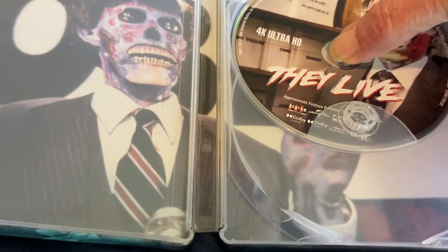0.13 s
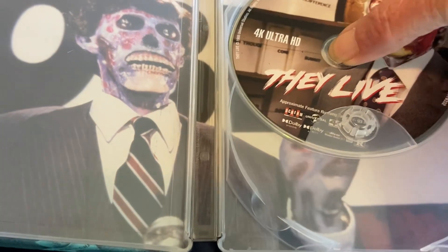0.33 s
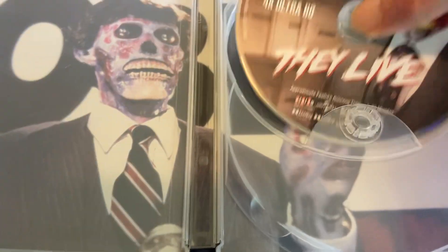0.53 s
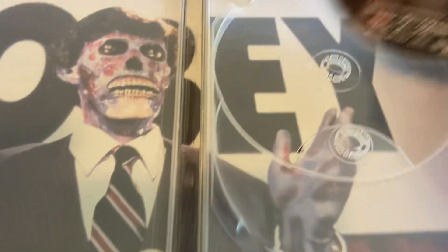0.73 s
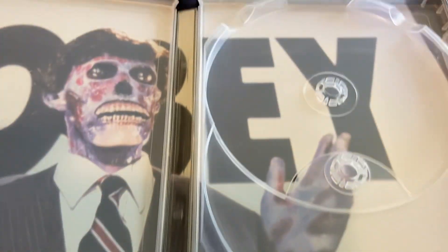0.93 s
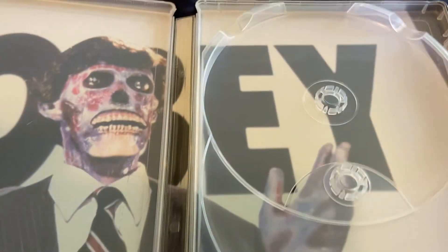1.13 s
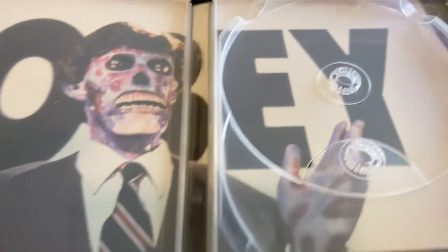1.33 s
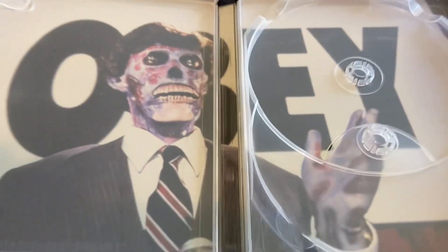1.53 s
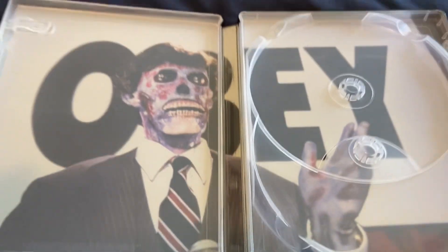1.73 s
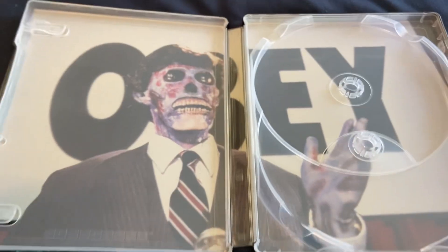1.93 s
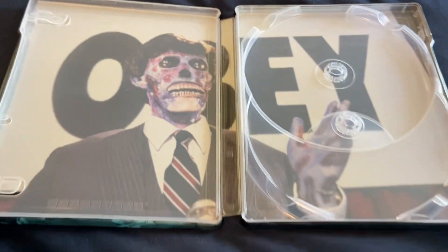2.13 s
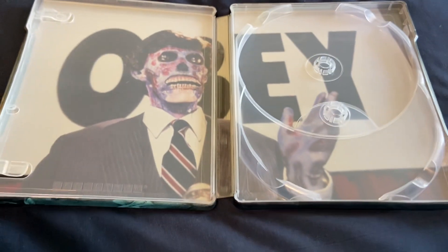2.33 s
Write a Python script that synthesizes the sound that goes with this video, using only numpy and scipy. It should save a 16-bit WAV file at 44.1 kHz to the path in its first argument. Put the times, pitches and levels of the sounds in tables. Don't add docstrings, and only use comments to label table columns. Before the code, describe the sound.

A disc pops off a plastic tray hub with one loud, sharp crack and brief rattle, followed by a short scrape, small clicks and soft rubs, very close to a stereo phone microphone in a quiet room.

```python
import sys
import numpy as np
from scipy import signal
from scipy.fft import rfft, irfft
from scipy.io import wavfile
from scipy.ndimage import uniform_filter1d

SR = 44100
rng = np.random.default_rng(int(sys.argv[2]) if len(sys.argv) > 2 else 0)


def volts_from_decibels(level):
    exponent = np.asarray(level, float) / 20
    return 10 ** exponent


def inscribe(sig):
    pcm = np.round(np.clip(np.atleast_2d(sig).T, -1, 1) * 32767)
    wavfile.write(sys.argv[1], SR, pcm.astype(np.int16))


N = 105840

SNAP_S = 0.2436
EDGE_HZ = 16800
TICK_SWELL_TURNS = 1.1

# f/Hz, level/dB
SKIN_COLOUR = [(500, -20.5), (1500, -7.5), (2300, -1), (5000, -4.5), (8000, -7), (12000, -9.5),
               (15300, -10), (16300, -36)]
# f/Hz, t60/s
ROOM_DECAY = [(100, 0.52), (500, 0.13), (1000, 0.32), (3000, .38), (7000, 0.37), (11000, 0.64),
              (13500, 0.2), (15000, 0.052)]


def evened(x):
    return x / np.sqrt(np.mean(x ** 2) + 1e-20)


def read(points, hz):
    f, value = np.transpose(points)
    return np.interp(np.log(hz + 1), np.log(f + 1), value)


def add(mix, s, sound):
    part = mix[round(s * SR):][:len(sound)]
    part += sound[:len(part)]


def shaped(x, gain):
    n = x.shape[-1]
    mirrored = np.concatenate([x, x[..., ::-1]], -1)
    spectrum = rfft(mirrored) * gain(np.fft.rfftfreq(2 * n, 1 / SR))
    return irfft(spectrum, 2 * n)[..., :n]


def resonance(x, hz, width):
    return evened(shaped(x, lambda f: 1 / (1 + (2 * (f - hz) / width) ** 2)))


def hiss(colour, rings=(), grain_db=-2.0):
    grain = evened(uniform_filter1d(rng.standard_normal(N), size=60))
    x = rng.standard_normal(N) * volts_from_decibels(grain_db * grain)
    x = evened(shaped(x, lambda f: volts_from_decibels(read(colour, f))))
    return evened(x + sum(volts_from_decibels(db) * resonance(x, hz, width) for hz, width, db in rings))


def ring(hz, db, t60, turns):
    t = np.arange(round(0.3 * SR)) / SR
    swell = 1 - np.exp(-t * hz / turns)
    return volts_from_decibels(db - 60 * t / t60) * swell * np.sin(2 * np.pi * hz * t)


def puff(s, length):
    u = np.maximum(np.arange(N) / SR - s, 0) / length
    return 2 * u * np.exp(1 - 2 * u)


def paired():
    # f/Hz, correlation (0 to 1)
    likeness = [(60, .93), (180, .9), (600, .6), (1500, .5), (3000, .9), (15000, .95)]
    left, other = rng.standard_normal((2, N))
    same = lambda f: np.clip(read(likeness, f), 0, 1)
    right = shaped(left, same) + shaped(other, lambda f: np.sqrt(1 - same(f) ** 2))
    return np.array([left, right])


def air():
    # f/Hz, level/dB
    air_colour = [(12, -38.5), (20, -10.5), (109, 3), (200, -20.5), (252, -25.5), (324, -30), (549, -36.5),
                  (13000, -63.5), (15000, -74)]
    hum = resonance(rng.standard_normal(N), 121.4, 9.3)
    rumble = evened(shaped(paired(), lambda f: volts_from_decibels(read(air_colour, f))))
    return volts_from_decibels(-53) * rumble + volts_from_decibels(-63.5) * hum


def room(x):
    hz, t, z = signal.stft(paired()[:, :SR // 2], SR, nperseg=256)
    tail = signal.istft(z * volts_from_decibels(-60 * t / read(ROOM_DECAY, hz)[:, None]), SR, nperseg=256)[1]
    tail = tail * np.clip(np.arange(tail.shape[1]) / SR / 0.01, 0, 1)
    return signal.fftconvolve(x[None], tail / np.linalg.norm(tail[0]), axes=1)[:, :N]


def wash():
    # f/Hz, level/dB
    wall_colour = [(150, -7.5), (450, -6.5), (800, 4), (1150, -5.5), (2500, -9), (7000, -19.5),
                   (13000, -32), (14800, -48.5)]
    hz, t, z = signal.stft(paired(), SR, nperseg=256)
    late = np.maximum(t - SNAP_S, 0)
    z = z * volts_from_decibels(read(wall_colour, hz)[:, None] - 60 * late / read(ROOM_DECAY, hz)[:, None])
    x = signal.istft(z, SR, nperseg=256)[1][:, :N]
    onset = np.clip((np.arange(N) / SR - SNAP_S) / 0.0027, 0, 1)
    return volts_from_decibels(-33.5) * x / x[:, :SR // 5].std() * onset


def rubs():
    # t/s, length/s, hiss level/dB, dull level/dB, share of length spent rising
    strokes = [(-.03, 0.13, -67.5, -68, 0.35), (0.117, 0.064, -72.5, -57.5, 0.19),
               (0.444, 0.048, -58, -48.5, 0.73), (0.658, 0.042, -84.5, -48.5, 0.47),
               (0.743, 0.097, -69.5, -104.5, 0.2), (0.884, 0.064, -70, -60.5, 0.32),
               (0.921, 0.11, -66, -69.5, 0.55), (1.313, 0.14, -66.5, -63.5, 0.42),
               (1.409, 0.14, -66.5, -67.5, 0.48), (1.568, 0.14, -70, -76.5, 0.66),
               (1.794, 0.3, -85, -77, 0.31), (0.525, 0.055, -81, -52, 0.32),
               (0.036, 0.21, -74.5, -74, 0.54), (0.588, 0.2, -75, -64, 0.24),
               (1.308, 0.032, -98, -82.5, 0.57)]
    # f/Hz, width/Hz, level/dB
    skin_rings = [(2200, 350, -8.5), (725, 500, -9)]
    # f/Hz, level/dB
    dull_colour = [(80, -25), (170, -0.5), (500, -8), (950, -10), (1400, -16.5), (2500, -21.5), (6000, -49)]
    t, bright, dull = np.arange(N) / SR, 0, 0
    for s, length, hiss_db, dull_db, rise in strokes:
        peak_s = s + np.clip(rise, 0.05, 0.95) * length
        arc = np.interp(t, [s, peak_s, s + length], [0, 1, 0])
        power = np.sin(np.pi / 2 * arc) ** 4.0
        bright = bright + volts_from_decibels(2 * hiss_db) * power
        dull = dull + volts_from_decibels(2 * dull_db) * power
    bright_rub = np.sqrt(bright) * hiss(SKIN_COLOUR, skin_rings, grain_db=1.0)
    return bright_rub + np.sqrt(dull) * hiss(dull_colour, grain_db=1.5)


def scrape():
    # f/Hz, level/dB
    rim_colour = [(120, 4), (200, 2), (1090, -6), (1540, 0), (1980, -6.5), (3750, -28.5), (9140, -11.5),
                  (14500, -30), (16500, -61)]
    # f/Hz, width/Hz, level/dB
    rim_rings = [(1500, 410, -0.5), (2700, 160, -9), (3900, 1100, -0.5)]
    start_s, end_s, rise_s, stop_s = 0.478, 0.618, 0.076, 0.0013
    t = np.arange(N) / SR
    drag = np.clip((t - start_s) / rise_s, 0, 1) * np.clip((end_s - t) / stop_s, 0, 1)
    return volts_from_decibels(-47.5) * drag * hiss(rim_colour, rim_rings, grain_db=1.4)


def pings():
    # t/s, f/Hz, level/dB, t60/s
    part_rings = [(0.0485, 13000, -49.5, 0.0039), (0.0515, 2700, -56, 0.0057), (.2437, 7200, -13.5, .005),
                  (.2439, 3580, -16, .005), (.2445, 2215, -11, 0.011), (.2492, 6600, -29, .006),
                  (.135, 200, -33, 0.029), (.684, 150, -41, 0.091), (1.316, 450, -59.5, 0.046),
                  (1.49, 558.7, -61, 0.067), (.6785, 1900, -36, 0.054), (1.862, 3200, -70.5, 0.029),
                  (.265, 256.7, -39.5, .15), (.247, 6100, -36, .006), (.529, 2850, -45, 0.013),
                  (.677, 2390, -44.5, 0.0071), (.6812, 3316, -51, 0.015), (0.2506, 5670, -23, 0.0067),
                  (.2525, 4050, -51, 0.012), (0.4172, 3760, -32.5, 0.012), (.4172, 1850, -32, 0.02),
                  (0.4192, 2890, -45, 0.014), (.4166, 4530, -40, 0.021), (0.4163, 12240, -38, .007),
                  (0.4161, 7600, -32.5, 0.0061), (.432, 3900, -69, 0.0094), (.4645, 11400, -54, .007),
                  (0.465, 2750, -45, 0.012), (0.4715, 7000, -36.5, 0.0046), (0.472, 12300, -46, 0.0055),
                  (.4745, 12000, -57, .007), (.669, 1334, -30, .014), (.6688, 12100, -55, .007),
                  (0.667, 6390, -56, .01), (.677, 560, -37, .04), (0.6775, 3770, -41, .015),
                  (.678, 1500, -39, 0.041), (0.882, 1898, -52.5, .012), (.8975, 1154, -55, 0.038),
                  (0.9252, 4300, -63.5, 0.017), (.9765, 5420, -60, 0.017), (0.982, 6400, -60, 0.014),
                  (.976, 881, -59.5, .12), (.981, 2454, -59, 0.022), (2.372, 804, -57.5, 0.019)]
    out = np.zeros(N)
    for s, hz, db, t60 in part_rings:
        add(out, s, ring(hz, db, t60, TICK_SWELL_TURNS))
    squeak_s, length_s, from_hz, to_hz = 0.984, 0.025, 3800, 5500
    u = np.arange(0, 1, 1 / (length_s * SR))
    hz = from_hz + (to_hz - from_hz) * np.sin(np.pi / 2 * u)
    squeak = np.sin(np.pi * u) * np.sin(2 * np.pi * np.cumsum(hz) / SR)
    add(out, squeak_s, volts_from_decibels(-64) * squeak)
    return out


def ticks():
    # t/s, crack level/dB, body level/dB, body f/Hz, t60/s
    contacts = [(0.0492, -52.5, -38, 885, 0.01), (.1268, -51, -41.5, 2720, 0.013),
                (0.1393, -61, -44, 380, 0.025), (0.147, -57.5, -56, 357, 0.093),
                (0.2, -68.5, -79, 6000, 0.0054), (0.4163, -35, -27, 581, 0.026),
                (0.4542, -55, -65, 4950, 0.0073), (0.4572, -44, -49.5, 6800, 0.025),
                (.463, -46, -31, 1540, 0.0062), (0.474, -55.5, -38, 2710, 0.013),
                (0.473, -43.5, -26, 231, 0.025), (0.527, -55, -33.5, 2880, 0.011),
                (0.5313, -48.5, -28, 2760, 0.0082), (0.613, -59.5, -44, 3855, 0.018),
                (0.6581, -57, -45.5, 3044, 0.011), (0.669, -38, -38.5, 3694, 0.0083),
                (0.6763, -36.5, -26.5, 1240, 0.017), (0.68, -53.5, -31, 1694, 0.0094),
                (.685, -83, -31, 254.2, 0.023), (0.7468, -45, -33.5, 12000, 0.0042),
                (0.8823, -56.5, -45, 694.3, 0.011), (0.897, -101, -48, 619, 0.024),
                (2.3461, -86.5, -37, 640, 0.02), (2.369, -84.5, -52.5, 593, 0.029),
                (2.381, -86.5, -60, 632, 0.027)]
    # f/Hz, level/dB
    crack_colour = [(300, -10.5), (1500, 11), (4000, -0.5), (8000, -5.5), (12000, -8.5), (16000, -12.5)]
    # pitch ratio, level/dB
    side_modes = [(1.25, -5), (.78, -8), (1.6, -7), (2.9, -10)]
    out = np.zeros(N)
    for s, crack_db, body_db, hz, t60 in contacts:
        noise = rng.standard_normal(1024)
        thin = lambda f: f ** 2 / (f ** 2 + (hz / 2) ** 2)
        crack = evened(shaped(noise, lambda f: volts_from_decibels(read(crack_colour, f)) * thin(f)))
        add(out, s, crack * volts_from_decibels(crack_db) * puff(0, 0.0011)[:1024])

        soft_db = min(crack_db - body_db + 12, 0)
        body = ring(hz, 0, t60, TICK_SWELL_TURNS)
        for ratio, db in side_modes:
            mode_hz = min(ratio * rng.uniform(0.95, 1.05) * hz, EDGE_HZ)
            mode_db = db + soft_db * max(np.log2(ratio), 0)
            body = body + ring(mode_hz, mode_db, t60 / 2, TICK_SWELL_TURNS)
        add(out, s + 0.025 / np.sqrt(hz), volts_from_decibels(body_db) * body)
    return out


def creak():
    t = np.arange(N) / SR
    strain = np.clip((t - 0.223) / 0.0031, 0, 1) * (t < SNAP_S)
    return volts_from_decibels(-48.5) * strain * hiss(SKIN_COLOUR, [(2200, 340, 6)])


def hub_crack():
    # f/Hz, level/dB
    teeth_colour = [(400, -21.5), (1200, -6.5), (2500, -1.5), (4200, -7.5), (5200, -10), (7500, -8),
                    (12500, -15.5), (16000, -12.5)]
    # t after the snap/s, level/dB, length/s
    chatter = [
        (-.002, -49.5, .002),
        (0, -9, 0.0013),
        (.0025, -20.5, 0.0017),
        (.0057, -20, .0015),
        (.0082, -28.5, 0.002),
    ]
    bursts = sum(volts_from_decibels(db) * puff(SNAP_S + s, length) for s, db, length in chatter)
    return hiss(teeth_colour) * bursts


def disc_flap():
    out, flap_hz, flap_turns = np.zeros(N), 935, 4.6
    turns = np.arange(0, flap_turns, flap_hz / SR)
    swing = np.sqrt(np.sin(np.pi * turns / flap_turns)) * np.sin(2 * np.pi * turns)
    add(out, SNAP_S + 0.0009, -volts_from_decibels(-9 + 0.5 * turns) * swing)
    return out


def tray_rings():
    # f/Hz, level/dB, t60/s
    tray_modes = [(724, -17.5, 0.03), (970, -25.5, .08), (1308, -16.5, .03), (1512, -18.5, 0.038),
                  (2010, -28, .03), (2382, -18, .03), (2720, -25, 0.059), (2836, -13, 0.021),
                  (3190, -25.5, 0.012), (3800, -20, 0.041), (4270, -15, 0.02), (7226, -14, 0.0064),
                  (11052, -17, 0.0088)]
    # f/Hz, level/dB, t60/s
    lid_modes = [(163, -19, 0.033), (213.6, -12.5, 0.044), (306, -6, 0.012), (410, -20, 0.032)]
    sway = (82, -15.5, 0.11)
    out, swell_turns = np.zeros(N), 0.4
    for hz, db, t60 in [*tray_modes, sway]:
        bend_delay = 0.052 / np.sqrt(hz)
        add(out, SNAP_S + bend_delay, ring(hz, db, t60, swell_turns))
    for hz, db, t60 in lid_modes:
        add(out, SNAP_S + 0.004, ring(hz, db, t60, swell_turns))
    return out


def snap():
    return creak() + hub_crack() + disc_flap() + tray_rings()


def scattered(x):
    t = np.arange(512) / SR
    taps = np.diff(rng.standard_normal((2, 513))) * volts_from_decibels(-60 * t / 0.004)
    taps = volts_from_decibels(-14) * taps / np.linalg.norm(taps, axis=1, keepdims=True)
    return x + signal.fftconvolve(x[None], taps, axes=1)[:, :N]


def ports(pair):
    # f/Hz, phase/rad
    phase_lead = [(0, -.2), (1000, -.6), (1900, -2.3), (2400, -.2), (5600, -.9), (6700, 0), (8400, 3),
                  (9800, 3.5), (11800, 6.3), (13300, 7), (14500, 9.4)]
    # f/Hz, level/dB
    balance = [(60, -1), (300, -2), (800, -2.5), (1300, 1), (3000, 0), (15000, -1)]
    lead = lambda f: np.interp(f, *np.transpose(phase_lead))
    port = lambda x, k: shaped(x, lambda f: volts_from_decibels(k * read(balance, f)) * np.exp(1j * k * lead(f)))
    return np.array([port(pair[0], 0.5), port(pair[1], -0.5)])


def scene():
    hits = ticks() + pings()
    drags = scrape() + rubs()
    around = air() + wash() + volts_from_decibels(-19) * room(hits + drags)
    return around + drags + scattered(snap() + hits)


def roll_off(x):
    return signal.sosfilt(signal.butter(12, 17150, fs=SR, output="sos"), x)


def record(dry):
    ceiling, low_cut_hz = 1.3, 38
    x = ceiling * np.tanh(ports(dry) / ceiling)
    low_cut = lambda f: f ** 2 / (f ** 2 + 1 + low_cut_hz ** 2)
    high_cut = lambda f: 1 / (1 + (f / EDGE_HZ) ** 60)
    return roll_off(shaped(x, lambda f: low_cut(f) * high_cut(f)))


dry = scene()
out = record(dry)
inscribe(out)
```